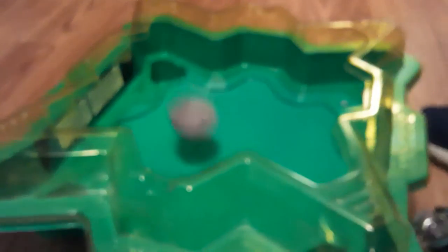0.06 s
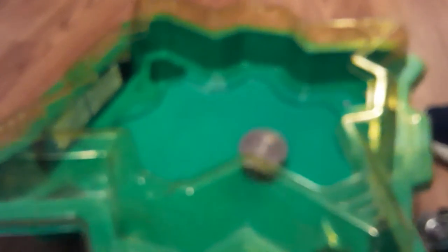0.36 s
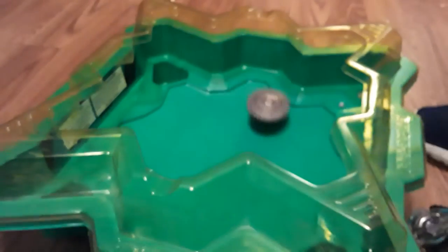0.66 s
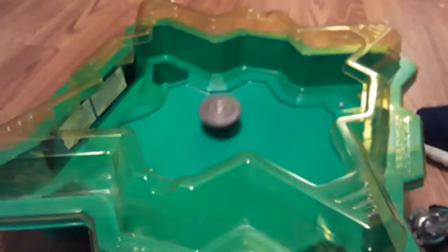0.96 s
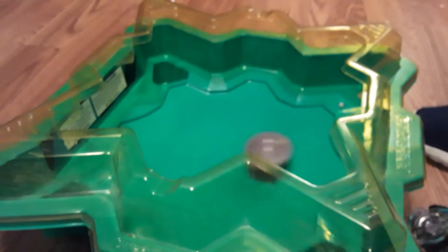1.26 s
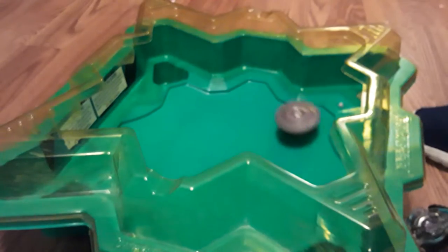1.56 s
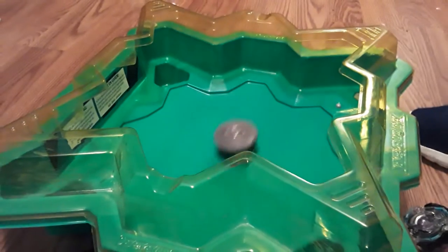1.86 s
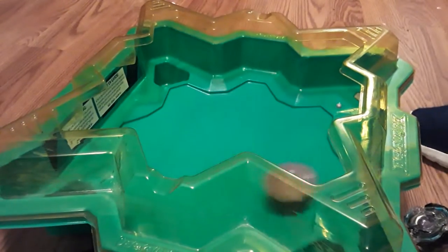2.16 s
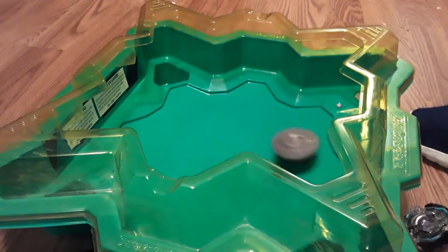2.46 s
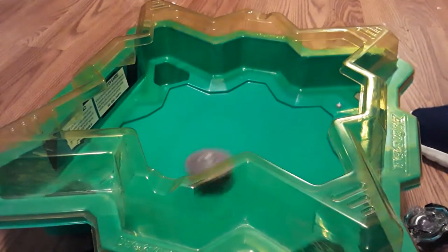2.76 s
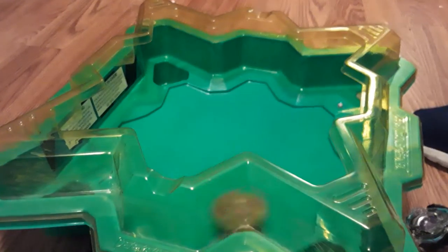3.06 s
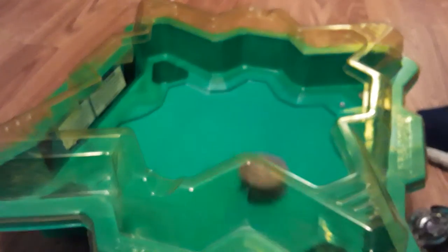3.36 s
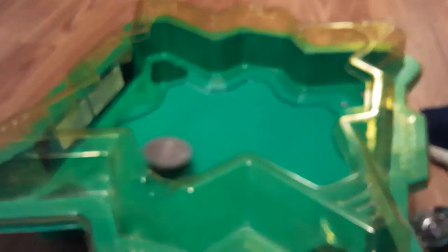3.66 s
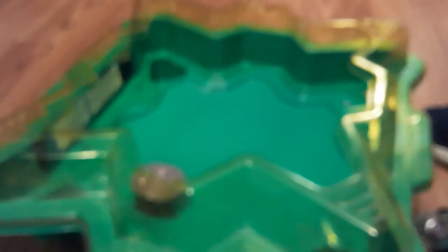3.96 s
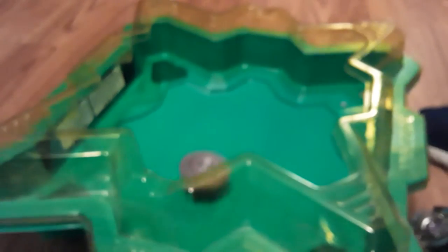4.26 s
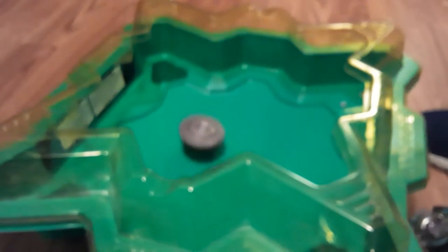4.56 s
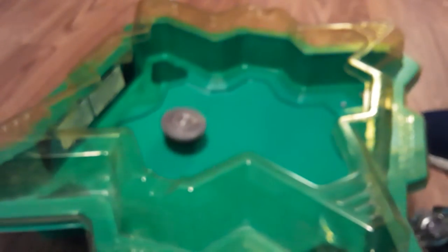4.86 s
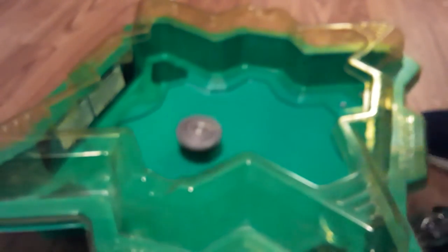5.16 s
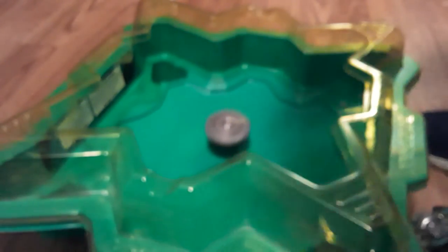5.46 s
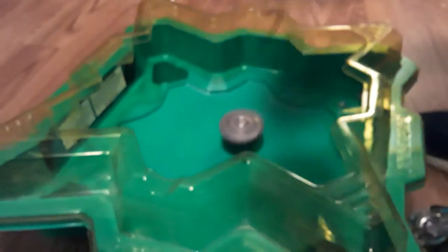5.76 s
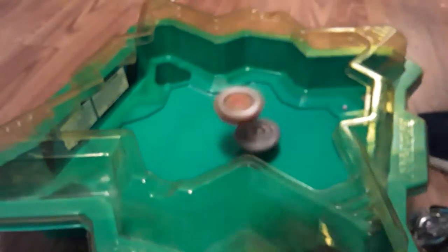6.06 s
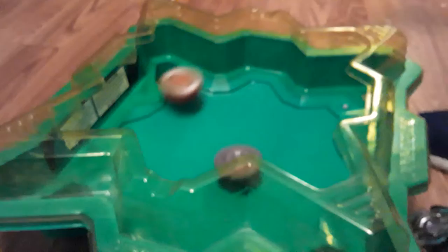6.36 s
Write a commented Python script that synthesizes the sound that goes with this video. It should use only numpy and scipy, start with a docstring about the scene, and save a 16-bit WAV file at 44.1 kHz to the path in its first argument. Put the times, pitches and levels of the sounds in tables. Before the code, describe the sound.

A toy top drops into a plastic stadium with a hollow boom, bounces in quickening taps and circles with a scratchy rasp and a low hum that slowly sinks. Nearby, plastic parts click and a toothed ripcord ratchets into a launcher. Near the end the cord rips out with a whine, a second top slams in, and the two clash metal on metal and scrape the wall. Heard close up in a quiet room.

```python
"""Two spinning tops in a plastic stadium.

A top drops into the bowl, booming it against a wooden floor, bounces, and circles on its rasping tip;
its imbalance makes a hum that sinks as it slows. Nearby, parts click and a toothed ripcord ratchets into
a launcher. The cord is ripped out with a whine, and a second top slams into the bowl, clashes with the
first, metal on metal, and skids along the hollow wall."""
import sys
import numpy as np
from scipy import signal
from scipy.fft import rfft, irfft, next_fast_len
from scipy.io import wavfile

SR = 44100
rng = np.random.default_rng(int(sys.argv[2]) if len(sys.argv) > 2 else 0)


def unload_audio(sound):
    """Save the sound as a 16-bit wav file, at the path given as the first command line argument."""
    columns = np.transpose(np.atleast_2d(sound))
    # keep every value between -1 and 1, then stretch to whole-number steps
    steps = np.round(np.clip(columns, -1, 1) * 32767)
    wavfile.write(sys.argv[1], SR, steps.astype(np.int16))


N = 286650
TIME = np.arange(N) / SR
FFT_SIZE = next_fast_len(N + SR)
FREQS = np.maximum(np.fft.rfftfreq(FFT_SIZE, 1 / SR), 1)


def from_db(db):
    """Decibels to gain."""
    return 10 ** (np.asarray(db) / 20)


def unit_rms(x):
    """Scale to unit power."""
    return x / np.sqrt(np.mean(x ** 2) + 1e-20)


def automation(rows):
    """Join timed breakpoints into one curve per column."""
    times, *columns = np.transpose(rows)
    return [np.interp(TIME, times, column) for column in columns]


def at_hz(points, hz):
    """Read a curve on a log-frequency axis."""
    freqs, values = np.transpose(points)
    return np.interp(np.log(hz), np.log(freqs), values)


def drift(rate_hz):
    """A smooth random wobble of unit power."""
    pole = np.exp(-2 * np.pi * rate_hz / SR)
    return unit_rms(signal.lfilter([1], [1, -2 * pole, pole * pole], rng.standard_normal(N + SR))[SR:])


# Stereo image of the noise and reverb. Each row: frequency in Hz, left-right correlation.
STEREO_LIKENESS = [(60, 0.17), (350, 0.99), (700, 0.55), (1500, 0.033), (3000, 0.058), (16000, 0.011)]
def noise():
    """White stereo noise, centred in the low mids and wide in the treble."""
    mid, side = rfft(rng.standard_normal((2, FFT_SIZE)))
    alike = np.clip(at_hz(STEREO_LIKENESS, FREQS), -1, 1)
    spectrum = np.sqrt((1 + alike) / 2) * mid + np.sqrt((1 - alike) / 2) * side * [[1], [-1]]
    return irfft(spectrum, FFT_SIZE)[:, :N]


def body(x, eq, resonances=()):
    """Colour a sound with an EQ curve and resonant peaks, at unit power gain."""
    power = np.ones(len(FREQS))
    for hz, width, db in resonances:
        power = power + (from_db(db) ** 2 - 1) / (1 + (2 * (FREQS - hz) / width) ** 2)
    gain = unit_rms(np.sqrt(np.abs(power)) * from_db(at_hz(eq, FREQS)))
    cepstrum = irfft(np.log(gain + 1e-9), FFT_SIZE)
    cepstrum[1:FFT_SIZE // 2] *= 2   # minimum phase: nothing rings before the hit
    cepstrum[FFT_SIZE // 2 + 1:] = 0
    return irfft(rfft(x, FFT_SIZE) * np.exp(rfft(cepstrum)), FFT_SIZE)[..., :N]


def clicks(times, db):
    """One impulse per contact."""
    out = np.zeros(N)
    np.add.at(out, np.clip(np.round(np.asarray(times) * SR).astype(int), 0, N - 1), from_db(db))
    return out


def bursts(times, db, fade_s, rise_s):
    """A noise burst per contact stands for dense, heavily damped modes."""
    fade, rise = np.exp(-1 / (SR * np.array([fade_s, rise_s])))
    envelope = signal.lfilter([1], [1, -fade], clicks(times, db) + 1e-18)
    return signal.lfilter([1 - rise], [1, -rise], envelope) * noise()


def ring(x, hz, t60):
    """One mode: each click starts a decaying sine."""
    pole, angle = from_db(-60 / (t60 * SR)), 2 * np.pi * hz / SR
    return signal.lfilter([0, np.sin(angle)], [1, -2 * pole * np.cos(angle), pole * pole], x + 1e-18)


# Room tone. Each row: frequency in Hz, relative level in dB.
AIR_EQ = [(18, -67), (30, -24), (95, 7), (194, 12), (280, -15), (449, -4), (1070, -21), (3670, -8),
          (8300, -16), (16000, -22)]
def room_tone():
    """A faint, steady bed of low noise and hiss."""
    return from_db(-60.5) * body(noise(), AIR_EQ)


# Reverb decay. Each row: frequency in Hz, T60 in seconds.
ROOM_DECAY = [(100, 0.43), (400, 0.11), (1200, 0.31), (3500, 0.28), (8000, 0.28), (16000, 0.22)]
def room(x, wet_db, onset_s=0.0015):
    """Direct sound plus a diffuse tail that dies band by band."""
    t = TIME[:SR // 2]
    tail, edges = 0, np.geomspace(70, 17920, 9)
    for low, high in zip(edges, edges[1:]):
        bandpass = signal.butter(2, [low, high], "band", fs=SR, output="sos")
        mid, side = signal.sosfilt(bandpass, rng.standard_normal((2, len(t))))
        hz = np.sqrt(low * high)
        alike = np.clip(at_hz(STEREO_LIKENESS, hz), -1, 1)
        band = np.sqrt(1 + alike) * mid + np.sqrt(1 - alike) * side * [[1], [-1]]
        tail = tail + band * from_db(-60 * t / at_hz(ROOM_DECAY, hz))
    tail = unit_rms(tail * (1 - np.exp(-(t / onset_s) ** 2))) / np.sqrt(len(t))
    return x + from_db(wet_db) * signal.fftconvolve(x, tail, axes=-1)[:, :N]


# Handling the launcher and second top. Each row: start in seconds, level in dB, brightness in dB.
LATCH_SNAPS = [(1.4453, -42.5, 12.5), (1.4965, -39, 5), (1.6108, -35, 9), (2.2669, -42, 3),
               (2.3552, -43.5, 4), (2.6984, -32, 1), (3.895, -46, 1), (4.1281, -34, 1.5),
               (4.246, -39.5, 3.5), (4.791, -38.5, 2.5), (4.8722, -36.5, 3.5), (4.9192, -45.5, 3.5),
               (5.075, -30, 3), (5.108, -23.5, 2.5), (5.7796, -31.5, -0.5)]
# Plastic clack and contact tick. Each row: frequency in Hz, relative level in dB.
CLACK_EQ = [(300, 15), (1400, -31.5), (2300, -2), (3600, -15), (5400, -10), (8000, -21.5), (16000, -39)]
TICK_EQ = [(2500, -5), (5000, 2), (8000, 4.5), (11500, 1.5), (16000, -3)]
# Low and high ring of the launcher's shell. Each row: pitch in Hz, T60 in seconds.
SHELL_MODES = [(2430, 0.024), (3590, 0.032)]
def latches(usual_db=-27.5, contact_s=0.000938):
    """Hard plastic parts snap together; a harder, sharper snap favours the high ring."""
    times, level, bright = np.transpose(LATCH_SNAPS)
    low_ring_db = level - bright + 4
    high_ring_db = level + bright / 2 + 0.75 * (level - usual_db) - 1
    clack = body(bursts(times, level + 14, fade_s=0.0045, rise_s=0.00011), CLACK_EQ)
    for (hz, t60), levels in zip(SHELL_MODES, [low_ring_db, high_ring_db]):
        for start, db in zip(times, levels):
            grip_detune = 1 + .008 * rng.standard_normal()
            clack = clack + ring(clicks([start + contact_s], [db]), hz * grip_detune, t60)
    low_cut = signal.butter(4, 1900, "high", fs=SR, output="sos")   # small parts radiate no bass
    tick = body(bursts(times, level + bright + 3, fade_s=0.0019, rise_s=0.00093), TICK_EQ)
    return signal.sosfilt(low_cut, clack) + tick


# Short pushes feed the cord in, then one rip pulls it out.
# Each row: start, attack and hold in seconds, full speed in teeth per second, level in dB.
CORD_STROKES = [(1.46, 0.043, 0.049, 75, -38), (1.772, 0.055, 0.054, 110, -52),
                (2.24, 0.036, 0.1, 110, -51.5), (2.702, 0.032, 0.053, 396, -19.5),
                (5.785, .036, 0.15, 1180, -20.5)]
# The gear's bright rattle. Each row: frequency in Hz, relative level in dB.
GEAR_EQ = [(300, -12.5), (1200, -13.5), (2200, -1.5), (3200, -4.5), (4500, -1), (6000, 0), (8500, 7),
           (11000, 4.5), (15500, 2.5)]
# The gear running free, and pressed by the taut cord. Each row: centre in Hz, width in Hz, boost in dB.
FREE_GEAR_PEAKS = [(2670, 110, 14.5), (3980, 790, 12), (3790, 380, 20.5)]
TAUT_GEAR_PEAKS = [(2560, 140, 4), (4520, 1000, 12.5)]
def ripcord(tooth_s=0.00037, coast_s=0.05, fade_s=0.026, taut_s=(5.78, 5.872)):
    """Every tooth snaps on the gear and rings the shell; pulled fast, they merge into a rising whine."""
    rattle, whine = np.zeros(N), np.zeros(N)
    waver, force = 1 + .02 * drift(60), from_db(2 * drift(85))
    for start, attack, hold, full_rate, db in CORD_STROKES:
        age = TIME - start
        on = (age > 0) & (age < attack + hold + 10 * fade_s)
        pull = np.minimum(age[on] / attack, 1)
        coasting = np.maximum(age[on] - attack - hold, 0)
        speed = np.minimum(age[on] / (attack * 2.1), 1) * np.exp(-coasting / coast_s)   # lags the pull
        rate = full_rate * (.35 + .65 * speed)
        teeth = np.cumsum(rate * waver[on]) / SR
        gain = from_db(db - 2.5) * pull ** 1.8 * np.exp(-coasting / fade_s)
        rubbing = 0.48 * np.minimum(rate / 340, 1)   # fills the gaps between teeth
        tooth_decay = np.exp(-(teeth % 1) / rate / tooth_s)
        rattle[on] += gain * unit_rms((rubbing + tooth_decay) * force[on])
        snaps = signal.lfilter([1], [1, -.7], np.diff(np.floor(teeth), prepend=0) * force[on])
        whine[on] += gain * unit_rms(snaps) * np.minimum(rate / 1400, .8)
    drive = rattle * noise() + whine
    taut = (TIME > taut_s[0]) & (TIME < taut_s[1])
    return body(drive * taut, GEAR_EQ, TAUT_GEAR_PEAKS) + body(drive * ~taut, GEAR_EQ, FREE_GEAR_PEAKS)


# Plastic chirps. Each row: centre in seconds, pitch in Hz, half-width in seconds, level in dB.
CHIRPS = [(5.845, 2360, 0.013, -28), (5.855, 2500, 0.0037, -19), (5.862, 2516, 0.0016, -13),
          (6.288, 1850, 0.0045, -24)]
def squeaks():
    """Plastic sticks and slips in short, rough chirps."""
    wavering_time = np.cumsum(1 + 0.036 * drift(179.4)) / SR
    out = 0
    for centre, hz, width, db in CHIRPS:
        envelope = from_db(db) * np.exp(-((TIME - centre) / width) ** 2 / 2)
        out = out + envelope * np.sin(2 * np.pi * hz * wavering_time)
    return np.sqrt(2) * out


# The skid after the clash. Each row: start in seconds, level in dB.
RIM_SCRAPES = [(6.2828, -18.5), (6.2844, -37), (6.351, -22), (6.3794, -30.5), (6.413, -27), (6.442, -30.5),
               (6.4538, -29), (6.478, -32)]
# Scrape colour. Each row: frequency in Hz, relative level in dB.
SCRAPE_EQ = [(300, -19), (1000, -15), (1400, 2), (1900, -1), (2400, -13.5), (4700, -9.5), (8000, -26),
             (16000, -33)]
# Scrape resonances. Each row: centre in Hz, width in Hz, boost in dB.
SCRAPE_PEAKS = [(1265, 58, 8.5), (1720, 74, 8.5)]
def grazes():
    """The second top's spinning rim bites the wall in short, rough scrapes."""
    times, db = np.transpose(RIM_SCRAPES)
    return body(bursts(times, db + 1.5, fade_s=0.0034, rise_s=0.0021), SCRAPE_EQ, SCRAPE_PEAKS)


# Hollow plastic and contact crack. Each row: frequency in Hz, relative level in dB.
HOLLOW_EQ = [(100, -4), (200, 0.5), (450, 2), (680, 0), (880, -3), (1100, -16.5), (2000, -11), (4000, -25),
             (16000, -56)]
CRACK_EQ = [(300, -16), (1300, 1.5), (2300, 2.5), (3500, 3.5), (5000, -2), (8000, -25.5), (16000, -28)]
def impacts(times, hollow_db, crack_db, tick_db, tick_s):
    """A blow cracks and ticks at the contact and the hollow plastic answers."""
    hollow = body(bursts(times, hollow_db, fade_s=0.026, rise_s=0.0011), HOLLOW_EQ)
    crack = body(bursts(times, crack_db, fade_s=0.004, rise_s=0.00083), CRACK_EQ)
    tick = body(bursts(times, tick_db, fade_s=tick_s, rise_s=.0005), TICK_EQ)
    return hollow + crack + tick


# The bowl's boom. Each row: pitch in Hz, relative level in dB, T60 in seconds.
BOWL_MODES = [(126.2, -4.5, 0.16), (188.5, 5, 0.22), (258, -1.5, 0.18), (311, 0.5, 0.15), (329, -11, 0.25),
              (406, 1, 0.12), (475.5, 2.5, 0.28), (511, 5, 0.047), (587.3, 2.5, 0.06), (720, -14, 0.065),
              (864, -11, 0.05), (981, -11, 0.24), (1303, 2, 0.055)]
def boom(times, level_db):
    """Blows set the bowl's modes booming, each by its own share."""
    out = 0
    for k, (hz, db, t60) in enumerate(BOWL_MODES):
        blows = clicks(times, level_db + db + rng.standard_normal(len(times))) * (-1) ** k
        pan = 0.052 * hz / 400 * (-1) ** k   # higher modes beam more to one side
        out = out + ring(blows, hz, t60) * np.array([[1 + pan], [1 - pan]]) / np.hypot(1, pan)
    return out


# Sharp hollow knocks: tops against the wall, and the snap as the launcher lets go.
# Each row: start in seconds, level in dB, brightness in dB.
SHARP_KNOCKS = [(1.8785, -40, 5), (3.2171, -33, 4), (3.2378, -36, 1), (3.285, -33, 2), (3.295, -47, 11),
                (5.8721, -22.5, 9.5), (6.2797, -29, 0), (6.328, -39, -0.5), (6.351, -43, 4),
                (6.376, -31, -4.5), (6.413, -33.5, -12)]
def sharp_knocks():
    """A wall hit or the launcher's release is a sharp tick and a hollow knock, with little boom."""
    times, db, bright = np.transpose(SHARP_KNOCKS)
    return boom(times, db - 32) + impacts(times, db - 5, db + bright, db + 2 * bright - 6.5, tick_s=0.003)


# A top lands in the bowl. Each row: start in seconds, level in dB, brightness in dB.
LANDINGS = [(0.0024, -35, -1), (0.152, -28.5, 2.5), (0.2628, -39, 7.5), (0.3223, -44.5, 4.5),
            (0.379, -49, 6.5), (0.4264, -46.5, 9), (0.5058, -61, 15), (0.536, -54, 7), (5.952, -8.5, -3),
            (6.2005, -25.5, -2.5)]
# The stadium's rumble. Each row: frequency in Hz, relative level in dB.
RUMBLE_EQ = [(50, -50.5), (85, -12), (125, -2.5), (250, -4), (400, 8.5), (600, -1.5), (1100, -7),
             (1900, -9), (3000, -26), (8000, -43)]
def landings(rock_s=0.024, rock_loss_db=6.5):
    """A landing booms; the stadium shudders and rocks on the floor, thumping twice more."""
    times, db, bright = np.transpose(LANDINGS)
    thud_db = 1.056 * db - 7.5
    rocks = np.arange(3)[:, None]
    thumps = boom((times + rock_s * rocks).ravel(), (thud_db - rock_loss_db * rocks).ravel())
    shudder = body(bursts(times, thud_db + 2.5, fade_s=0.037, rise_s=.012), RUMBLE_EQ)
    return thumps + shudder + impacts(times, db - 4, db + bright, db + bright - 8.5, tick_s=0.0089)


def settling(start_s=0.552, gap_s=0.037, count=11):
    """The last tiny bounces come ever faster, about equally loud, until the tip stays down."""
    bounce = np.arange(count)
    times = start_s + np.cumsum(gap_s * .94 ** bounce)
    taps = bursts(times, rng.standard_normal(count) + 0.05 * bounce, fade_s=0.0018, rise_s=0.00049)
    return from_db(-48.5) * body(taps, CRACK_EQ) + from_db(-51.5) * body(taps, TICK_EQ)


# Top against top. Each row: start in seconds, level in dB.
RIM_HITS = [(6.1236, -9.5), (6.1312, -11)]
# Metal colour. Each row: frequency in Hz, relative level in dB.
METAL_EQ = [(400, -1), (2400, -8.5), (3300, -0.5), (6000, -3.5), (9000, -1), (14500, 0), (16000, -21)]
# Rim resonances. Each row: centre in Hz, width in Hz, boost in dB.
METAL_PEAKS = [(3170, 120, 5), (5550, 216, 11.5), (10800, 300, 3.5), (14600, 530, 6.5)]
def clash():
    """The metal rims of the two tops meet in a bright double crack."""
    times, db = np.transpose(RIM_HITS)
    return body(bursts(times, db, fade_s=0.0029, rise_s=0.00067), METAL_EQ, METAL_PEAKS)


# The top's push on the bowl, swelling every lap, and its tip's slip across the slope.
# Each row: time in seconds, level in dB.
PUSH_CURVE = [(0.55, -43.5), (0.83, -49.5), (0.95, -64), (1.17, -48.5), (1.45, -45), (1.8, -58.5),
              (2.22, -49), (2.45, -53), (2.82, -49), (3.05, -55.5), (3.36, -54.2), (3.57, -41.9),
              (3.78, -44.5), (4.07, -62.5), (4.62, -48.5), (4.8, -59.5), (4.98, -79), (5.42, -54),
              (5.75, -67)]
SLIP_CURVE = [(0.3, -85), (0.93, -82), (1.17, -55.5), (1.68, -55.5), (1.96, -48), (2.45, -61.5),
              (2.62, -52), (3.08, -51.5), (3.31, -70), (3.48, -51.5), (3.72, -51.5), (4.17, -63.5),
              (4.7, -57), (5.1, -73), (5.29, -54), (5.75, -64.5), (6.2, -75)]
# The tip's rasp and scratch. Each row: frequency in Hz, relative level in dB.
RASP_EQ = [(1200, -31), (2300, 4), (3000, 3.5), (3900, 2), (5000, 1), (7000, -19), (16000, -9)]
SCRATCH_EQ = [(800, -3), (1800, -4.5), (3200, -12.5), (4900, -6.5), (6100, -11.5), (8100, -4.5), (9300, -9),
              (11000, -5.5), (12900, -16), (16000, -19.5)]
def tip(turns, usual_push_db=-52, usual_slip_db=-56):
    """The tip rumbles as it presses on the bowl; where it slips it rasps and scratches once a turn."""
    push_db, = automation(PUSH_CURVE)
    slip_db, = automation(SLIP_CURVE)
    turn_pulse = 0.23 + np.exp(2.1 * (np.cos(2 * np.pi * turns) - 1))
    flutter = unit_rms(turn_pulse * from_db(drift(60)))
    grains = unit_rms(np.sqrt(turn_pulse) * from_db(0.5 * drift(160)))
    rumble = body(from_db(-59 + 0.43 * (push_db - usual_push_db)) * noise(), RUMBLE_EQ)
    rasp = body(from_db(-61 + 0.29 * (slip_db - usual_slip_db)) * grains * noise(), RASP_EQ)
    scratch = body(from_db(slip_db) * flutter * noise(), SCRATCH_EQ)
    return rumble + rasp + scratch


# The hum's tone shifts with the top's place in the bowl. Each row: time in seconds,
# second harmonic against the first in dB, buzz against the push in dB.
HUM_TONE = [(0.6, -4, -4), (1.2, -2.5, -2.5), (1.5, -3.5, -7.5), (1.8, -8, -1), (2.22, 5.5, 6.5),
            (2.5, 7, -9.5), (3.0, -3.5, 11), (3.4, 8.5, -8.5), (3.7, 8, -4.5), (4.3, -17.5, -5.5),
            (4.65, 5, -3), (5.4, 0, -3.5)]
# Colour of the buzzing overtones. Each row: frequency in Hz, relative level in dB.
BUZZ_EQ = [(240, -7), (290, -6), (360, -9), (450, -2), (530, -13), (610, -13.5), (800, -16), (1100, -57),
           (1600, -67)]
def hum(turns, spin_hz, odd_boost_db=3.5, wander_db=3.0):
    """The unbalanced top shakes the bowl once a turn; overtones swell and fade as it wanders."""
    push_db, = automation(PUSH_CURVE)
    octave_db, buzz_db = automation(HUM_TONE)
    octave = from_db(octave_db)
    sway = (np.sin(2 * np.pi * turns) + octave * np.sin(4 * np.pi * turns)) / np.hypot(1, octave)
    buzz, power = 0, 0
    for k in range(3, 15):   # the tip rocks to and fro, which favours odd harmonics
        gain = from_db(at_hz(BUZZ_EQ, k * spin_hz) + odd_boost_db * (k % 2) + wander_db * drift(8.9))
        buzz = buzz + gain * np.sin(2 * np.pi * (k * turns + rng.random()))
        power = power + gain ** 2
    fade_in = np.clip((TIME - .3) / 1.17, 0, 1)   # builds as the bouncing ends
    return fade_in * np.sqrt(2) * from_db(push_db) * (sway + from_db(buzz_db) * buzz / np.sqrt(power))


def left_late(x, lag_s):
    """Sound from the right reaches the left microphone later."""
    return np.array([np.interp(TIME - lag_s, TIME, x[0]), x[1]])


def scene(start_hz=127, slow_hz=50, drag_s=5):
    """The circling top sits slightly right; the hits and the launcher sit slightly left."""
    spin_hz = slow_hz + (start_hz - slow_hz) * np.exp(-TIME / drag_s)   # drag slows the top
    turns = np.cumsum(spin_hz * (1 + 0.0036 * drift(32))) / SR
    contact = room(tip(turns) + settling(), wet_db=-5.0)
    top = left_late(contact + hum(turns, spin_hz), lag_s=0.00031)
    blows = room(landings() + sharp_knocks() + squeaks() + grazes(), wet_db=-8.5)
    launcher = room(latches(), wet_db=-5.0) + room(ripcord(), wet_db=-0.5)
    rims = room(clash(), wet_db=-1.5)
    action = blows + rims + launcher
    return top * from_db([[-.4], [.4]]) + action * from_db([[.3], [-.3]]) + room_tone()


def record(dry):
    """The microphones shed the deep bass, peaks clip at full scale and the highest treble is cut."""
    low_cut = signal.butter(4, 72, "high", fs=SR, output="sos")
    high_cut = signal.ellip(10, .1, 80, 16100, fs=SR, output="sos")
    return signal.sosfilt(high_cut, np.clip(signal.sosfilt(low_cut, dry), -1, 1))


dry = scene()
out = record(dry)
unload_audio(out)
```